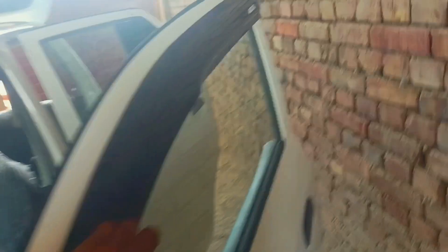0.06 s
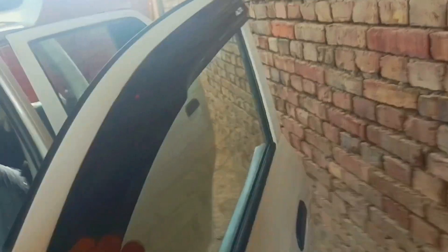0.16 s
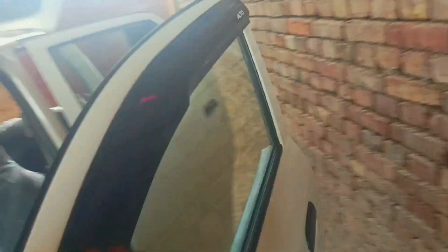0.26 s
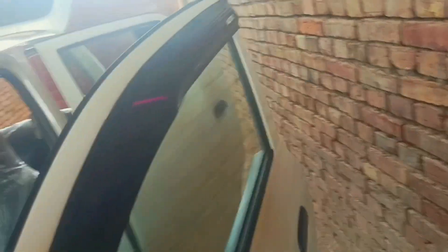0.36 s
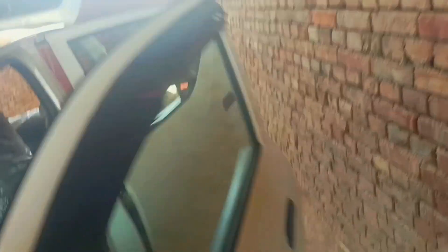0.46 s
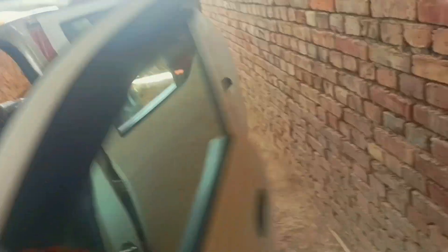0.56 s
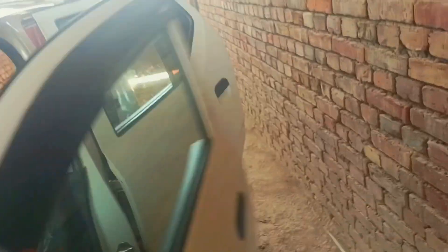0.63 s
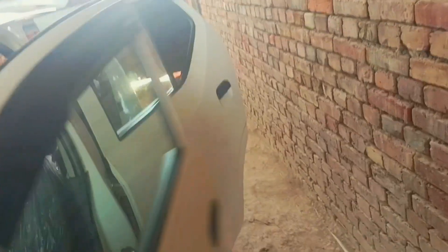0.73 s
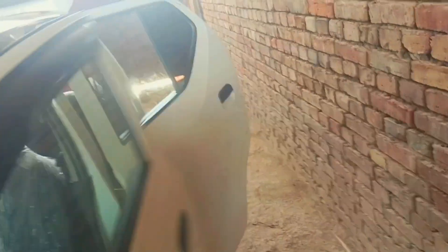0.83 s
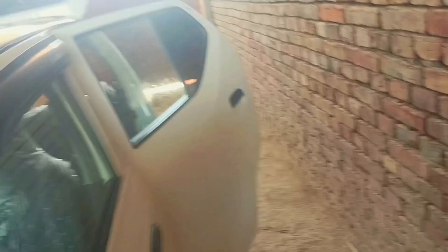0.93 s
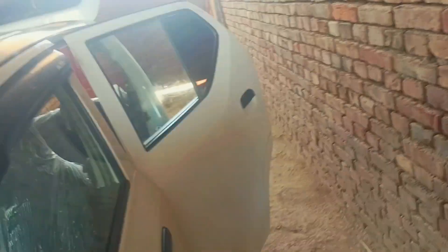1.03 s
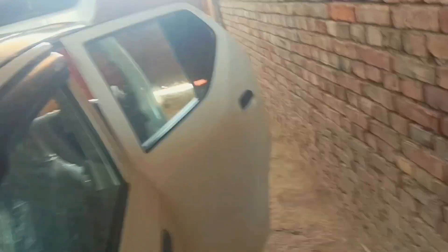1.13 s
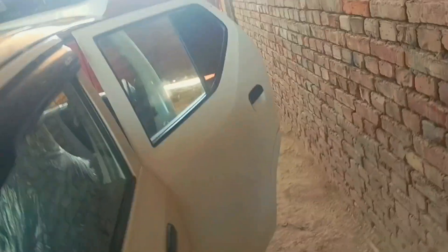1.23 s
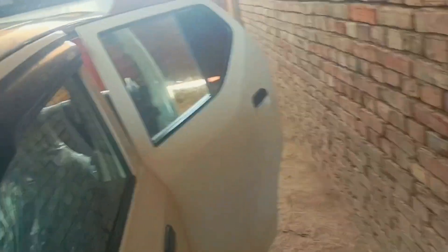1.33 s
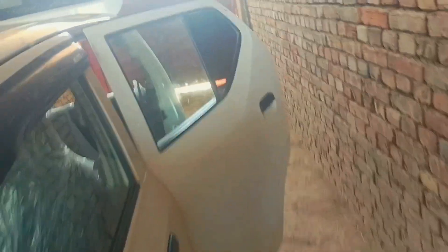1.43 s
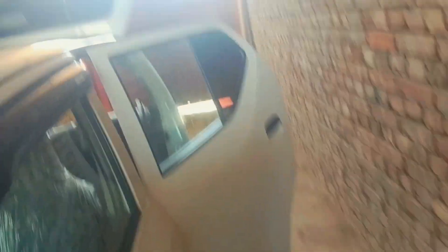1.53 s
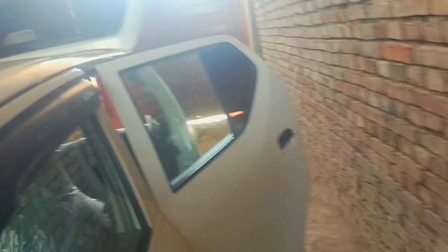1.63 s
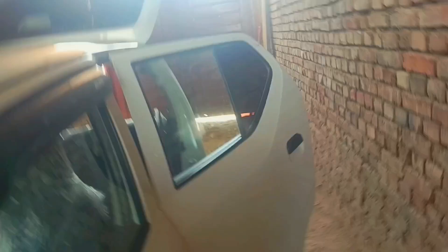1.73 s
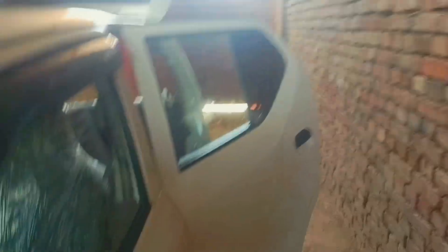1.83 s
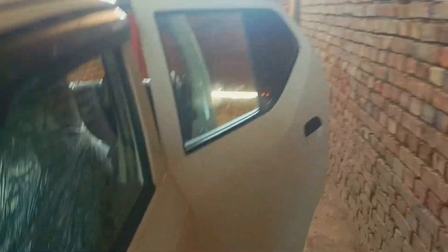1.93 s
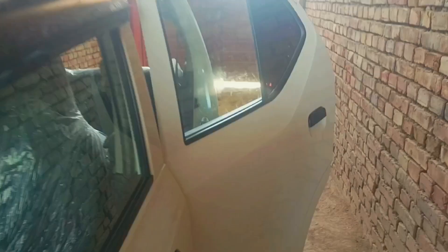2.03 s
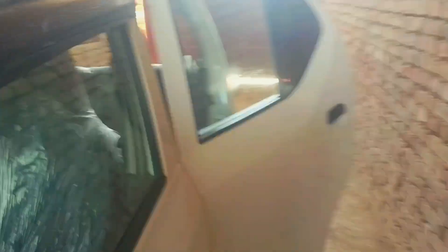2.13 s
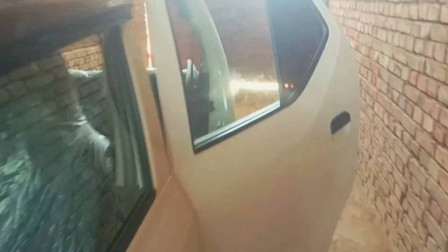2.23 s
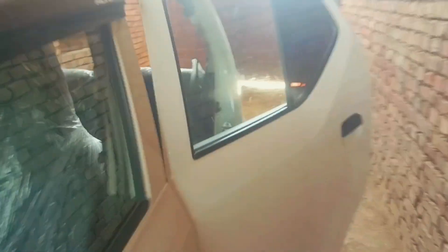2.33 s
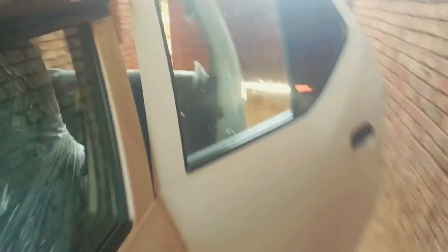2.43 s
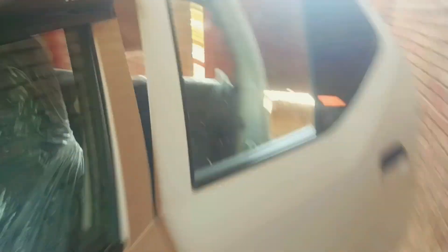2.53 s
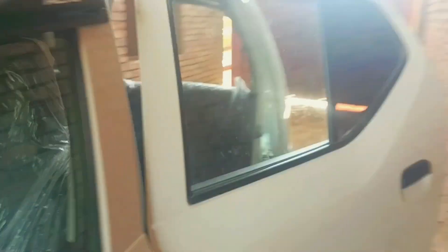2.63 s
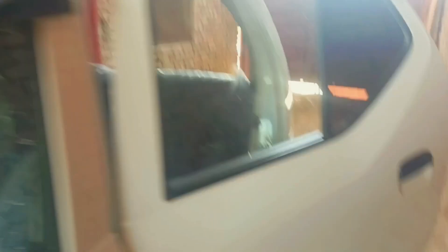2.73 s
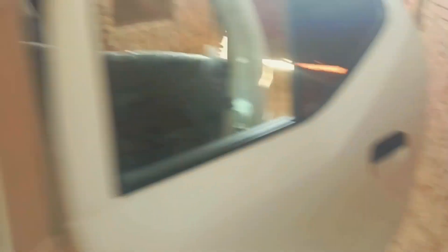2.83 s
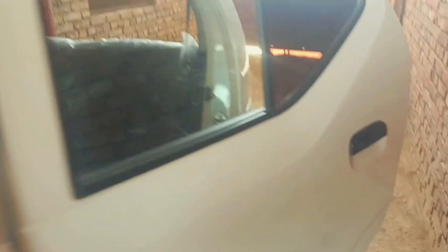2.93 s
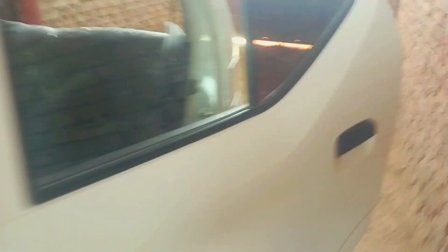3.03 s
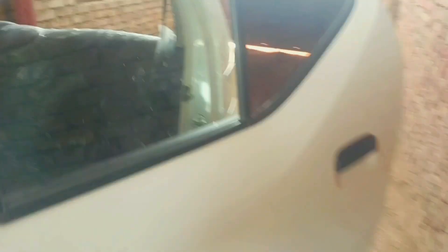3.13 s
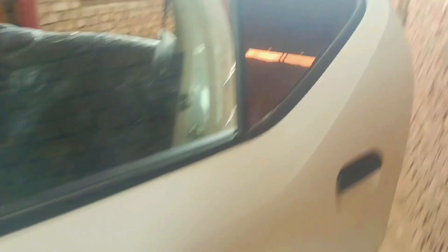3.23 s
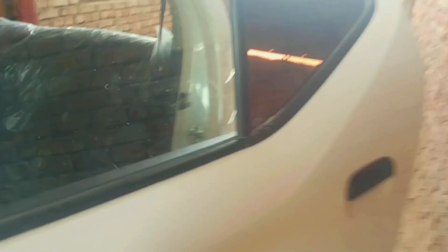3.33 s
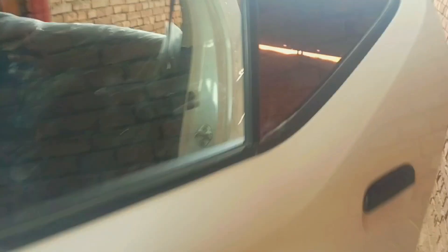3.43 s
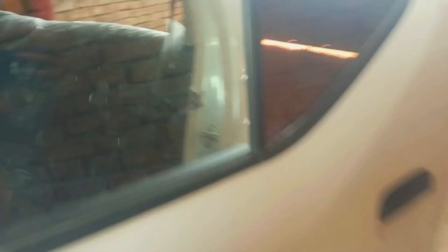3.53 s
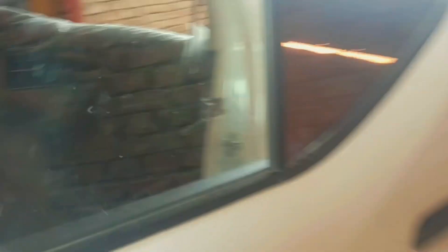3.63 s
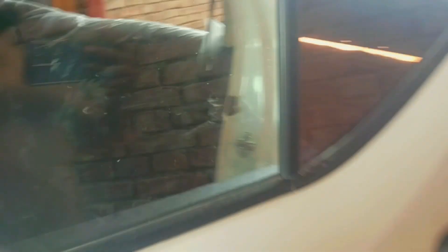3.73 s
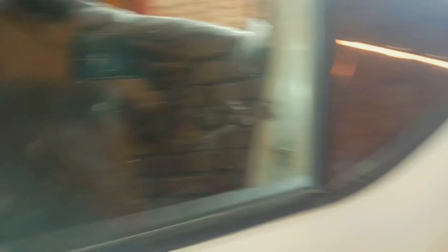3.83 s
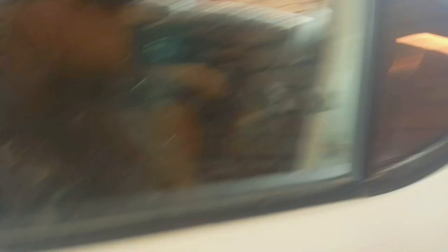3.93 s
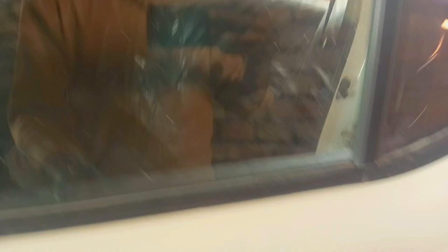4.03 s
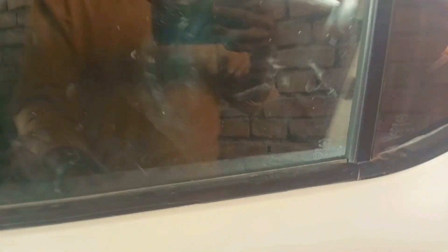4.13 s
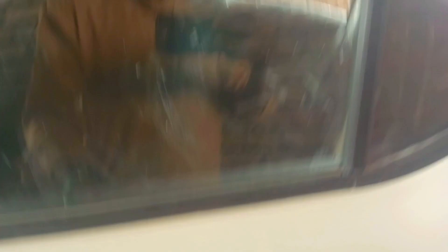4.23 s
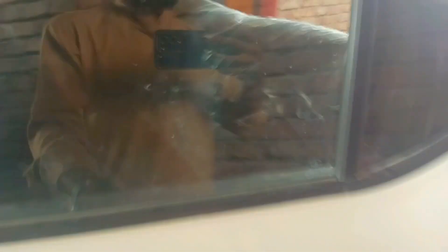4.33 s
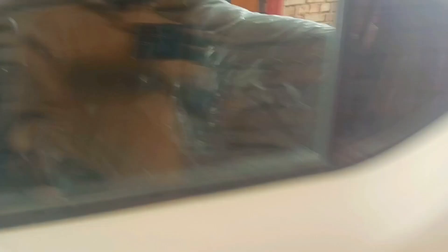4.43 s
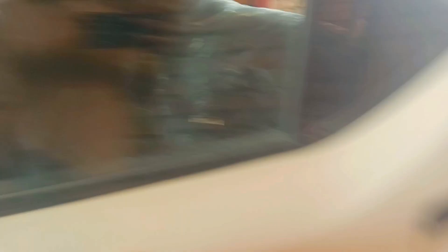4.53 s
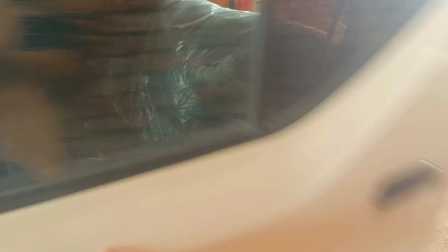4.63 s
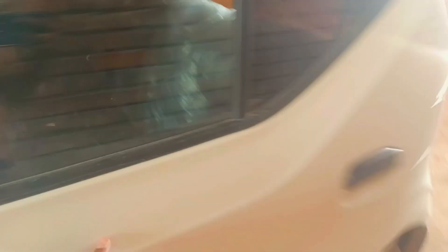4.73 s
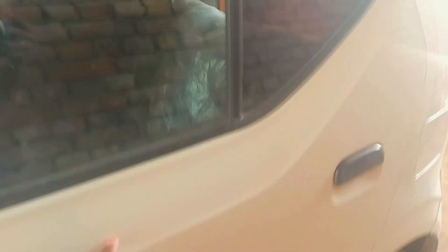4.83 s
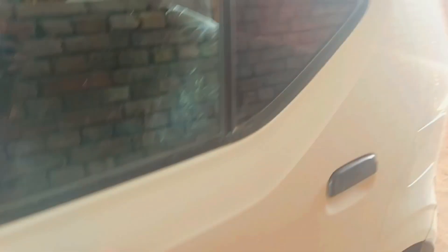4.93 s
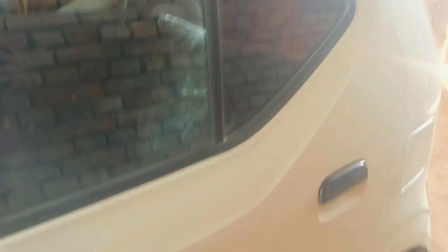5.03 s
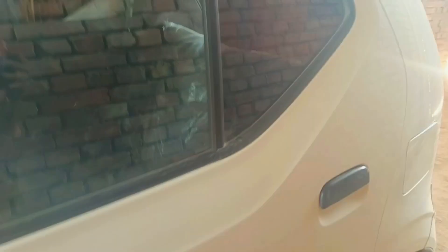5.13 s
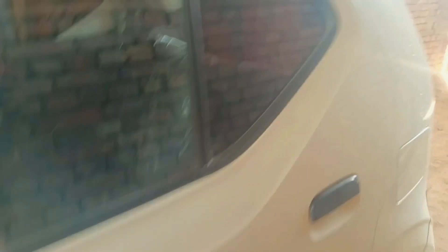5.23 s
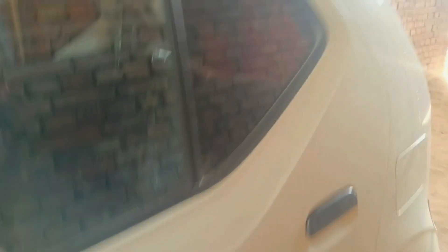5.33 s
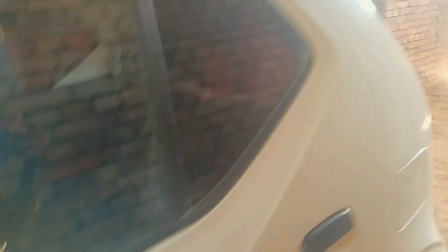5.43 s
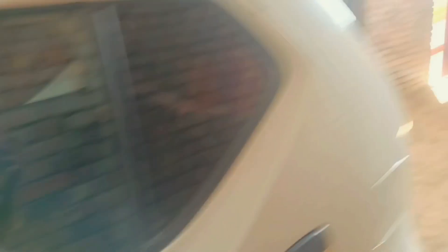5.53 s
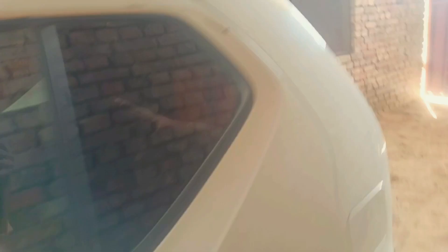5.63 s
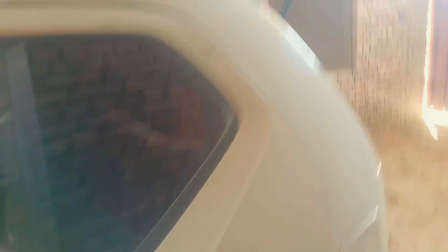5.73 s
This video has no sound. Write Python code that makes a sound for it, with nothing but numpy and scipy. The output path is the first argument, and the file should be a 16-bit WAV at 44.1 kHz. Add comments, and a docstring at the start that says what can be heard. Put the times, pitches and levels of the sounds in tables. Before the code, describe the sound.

A car door slams and rattles, a handle clicks, then a second door slams, close by, over faint scuffing and rumble.

```python
"""Two doors of a small car slam in a narrow brick lane, an arm's length from a hand-held phone.
Shoes scuff, a sleeve swishes and grit ticks over handling rumble and faint hiss. At 1 s the front door
slams: latch strike, landing on the frame, ringing panels, cabin boom, then loose parts rattling.
Knocks and a faint whine follow; the rear handle clicks at 2.8 s and the open door is bumped at 3.5 s.
At 4.9 s the rear door slams, then fingers rub the phone."""
import sys
import numpy as np
from scipy import signal
from scipy.fft import rfft, irfft, next_fast_len
from scipy.io import wavfile

SR = 44100
rng = np.random.default_rng(int(sys.argv[2]) if len(sys.argv) > 2 else 0)


def wrap_up_sound(samples):
    """Save the sound to the file named by the first command line argument, as 16-bit audio."""
    columns = np.atleast_2d(samples).T
    # keep every value between -1 and 1, then stretch to whole-number steps
    tamed = np.clip(columns, -1, 1)
    steps = np.round(tamed * 32767).astype(np.int16)
    wavfile.write(sys.argv[1], SR, steps)


N = 254181
TIME_S = np.arange(N) / SR
AGE_S = TIME_S[:SR]  # 1 s from an onset

# rear door panel modes [f/Hz, level/dB, t60/s]
REAR_MODES = [(114, -14, 0.217), (157, -8, 0.49), (213, -3, 0.23), (262.6, -3, 0.2), (295.6, -3, 0.15),
              (332, -1.5, 0.06), (413, -10.5, 0.26), (447.5, 5.5, 0.31), (527.7, -4, 0.26),
              (598, -6.5, 0.19), (870, -12.5, 0.23), (1087, -6, 0.16), (1250, -7, 0.17), (1255, -8.5, 0.19),
              (1390, -13.5, 0.25), (1850, -16, 0.26), (2225, -18, 0.21), (2280, -19.5, 0.16),
              (2390, -18, 0.17), (2620, -13, 0.12), (3320, -26, 0.18)]


def amp(db):
    """Decibels to gain."""
    return 10 ** (np.asarray(db) / 20)


def add(track, t_s, sound):
    """Mix a sound into a track from t_s on."""
    start = max(int(t_s * SR), 0)
    part = sound[:max(N - start, 0)]
    track[start:start + len(part)] += part


def along(points, hz):
    """Interpolate [f/Hz, value] points over log frequency."""
    f_hz, value = np.transpose(points)
    return np.interp(np.log(np.maximum(hz, 1)), np.log(f_hz), value)


def tilted(colour, db_per_oct):
    """Spectrum tilted about 2 kHz."""
    return [(hz, db + db_per_oct * np.log2(hz / 2000)) for hz, db in colour]


def noise(colour, size, patchy_db=5.5, width_hz=85):
    """Coloured noise, rms 1, with random resonances about width_hz wide."""
    hz = np.arange(size // 2 + 1) * SR / size
    ripple = np.interp(hz / width_hz, np.arange(1024), rng.standard_normal(1024))
    db = along(colour, hz) + patchy_db * ripple * np.minimum(hz / 700, 1)  # long waves pass evenly
    x = irfft(amp(db) * np.exp(2j * np.pi * rng.random(len(hz))), size)
    return x / x.std()


def grain(size, rate_hz, depth_db):
    """Uneven contact: random gain, rms 1, moving at rate_hz."""
    steps = np.arange(size) * rate_hz / SR
    gain = amp(depth_db * np.interp(steps, np.arange(size // 8), rng.standard_normal(size // 8)))
    return gain / np.sqrt(np.mean(gain ** 2))


def stream(colour, size, rate_hz, depth_db, patchy_db):
    """Sustained grainy noise; three crossfading voices shift its resonances."""
    weights = np.array([grain(size, 7, 9) for _ in range(3)])
    fft_size = next_fast_len(size, real=True)
    voices = np.array([noise(colour, fft_size, patchy_db)[:size] for _ in range(3)])
    blend = np.sum(weights * voices, axis=0) / np.sqrt(np.sum(weights ** 2, axis=0))
    return blend * grain(size, rate_hz, depth_db)


def fade(t60_s, rise_s):
    """Impact envelope: quick rise, exponential fall."""
    return (1 - np.exp(-AGE_S / rise_s)) * np.exp(-np.log(1000) * AGE_S / t60_s)


def ring(modes, rise_s, detune):
    """Damped modes; each blow lands elsewhere and shifts them slightly."""
    out = np.zeros(SR)
    for k, (hz, db, t60_s) in enumerate(modes):
        shifted_hz = hz * (1 + detune * rng.standard_normal())
        out += (-1) ** k * amp(db) * fade(t60_s, rise_s) * np.sin(2 * np.pi * shifted_hz * AGE_S)
    return out


def contact(hz, t60_s):
    """Brief contact: one broad damped resonance, faint tail from the lane."""
    hump = [(hz / 8, -36), (hz / 1.9, -12), (hz, 0), (hz * 1.7, -15), (hz * 4, -34), (hz * 30, -70)]
    return noise(hump, SR) * (fade(t60_s, t60_s / 90) + amp(-25) * fade(0.17, 0.019))


def background():
    """Lumpy rumble of the hand on the phone, swelling hiss, steady outdoor air."""
    # spectra [f/Hz, level/dB]
    rumble_colour = [(20, -38.5), (40, -20), (65, -7), (108, 4.5), (155, -3.5), (210, -17.5), (300, -41.5),
                     (600, -55)]
    hiss_colour = [(200, -13), (700, -27), (1100, -20.5), (1600, -3), (2200, 2.5), (4000, -3.5), (6300, -3),
                   (7800, -11), (9500, -6.5), (11500, -23), (15000, -18.5)]
    air_colour = [(100, -2), (300, -7.5), (700, -13), (1500, -14.5), (4000, -23), (9000, -21),
                  (15000, -32.5)]
    # envelopes [t/s, level/dB]
    rumble_level = [(0, -49), (.86, -56), (.9, -77), (1.5, -50), (2.03, -47), (2.35, -69), (2.47, -50),
                    (2.55, -73.5), (2.58, -45.5), (2.82, -44), (3.08, -52), (3.52, -46.5), (3.7, -49.5),
                    (4.1, -48.5), (4.28, -56.5), (4.31, -80), (4.56, -53.5), (4.86, -55), (5.22, -41.5),
                    (5.5, -55), (5.76, -58)]
    hiss_level = [(0, -55), (.34, -58.5), (.46, -76.5), (.68, -68.5), (1.02, -67), (1.45, -53), (2.15, -53),
                  (2.55, -61), (2.82, -57.5), (3.12, -63), (3.5, -59.5), (3.66, -76.5), (4.7, -81.5),
                  (5.25, -70), (5.76, -59.5)]
    rumble = stream(rumble_colour, N, rate_hz=9.5, depth_db=1.5, patchy_db=1)
    rumble *= amp(np.interp(TIME_S, *np.transpose(rumble_level)))
    hiss = stream(hiss_colour, N, rate_hz=120, depth_db=1.4, patchy_db=3.5)
    hiss *= amp(np.interp(TIME_S, *np.transpose(hiss_level)))
    return rumble + hiss + amp(-78.5) * noise(air_colour, N, patchy_db=0)


def scuffs():
    """Grit crunches under a sliding sole, then dies away in the lane."""
    # shoe slides [t/s, length/s, level/dB, tilt/(dB/oct)]
    slides = [(0, 0.038, -41, -1.5), (0.037, 0.04, -35, -2), (1.611, 0.03, -41, 1.5),
              (2.634, 0.0088, -39.5, -1.5), (2.719, 0.17, -51, 2), (3.226, 0.06, -31.5, -0.1),
              (3.485, 0.011, -45, -3), (3.688, 0.017, -66, 10), (3.791, 0.021, -52.5, -1.5),
              (3.814, 0.015, -41, -3), (4.475, 0.021, -59, 6)]
    # grit spectrum [f/Hz, level/dB]
    grit_colour = [(200, -11.5), (500, -9), (850, -13.5), (1500, 1.5), (2700, 3), (4200, -3.5),
                   (6500, -9.5), (9500, -16.5), (11500, -29.5), (15000, -24)]
    out = np.zeros(N)
    for t_s, length_s, db, db_per_oct in slides:
        envelope = (1 - np.exp(-AGE_S / 0.0038)) * np.exp(-np.maximum(AGE_S - length_s, 0) / 0.026)
        grit = noise(tilted(grit_colour, db_per_oct), SR, patchy_db=3)
        add(out, t_s, amp(db) * envelope * grit * grain(SR, rate_hz=695, depth_db=1.5))
    return out


def sleeve():
    """Cloth rustles with arm speed, one bell curve per move."""
    # arm moves [peak t/s, length/s, level/dB, tilt/(dB/oct)]
    moves = [(0.057, 0.046, -38, -1), (0.247, 0.071, -48.5, 3.5), (0.378, 0.093, -61.5, 2),
             (2.929, 0.16, -53.5, 5), (3.837, 0.029, -48.5, 6), (4.088, 0.067, -65.5, 4.5),
             (4.25, 0.068, -64.5, 3.5), (4.483, 0.067, -68.5, 4.5), (4.596, 0.055, -75, 9.5),
             (4.848, 0.15, -67.5, 5), (5.17, 0.19, -47, -3), (5.362, 0.13, -44, -5.5),
             (5.52, 0.14, -49, -1.5)]
    # cloth spectrum [f/Hz, level/dB]
    cloth_colour = [(600, -52), (950, -20.5), (1300, -1), (1700, 8.5), (2300, 1.5), (3200, -1.5),
                    (5000, -17), (9000, -18), (15000, -50)]
    out = np.zeros(N)
    for peak_s, length_s, db, db_per_oct in moves:
        start_s = max(peak_s - 0.5, 0)
        speed = np.exp(-2 * ((start_s + AGE_S - peak_s) / length_s) ** 2)
        rustle = stream(tilted(cloth_colour, db_per_oct), SR, rate_hz=330, depth_db=1.5, patchy_db=5)
        add(out, start_s, amp(db) * speed * rustle)
    return out


def ticks():
    """Tiny hard contacts with no body behind them."""
    # lock and grit ticks [t/s, level/dB, f/Hz, t60/s]
    hits = [(.329, -47, 8500, 0.062), (0.535, -62, 10100, 0.13), (0.648, -60.5, 10200, 0.21),
            (.98, -39, 14500, 0.018), (0.996, -51.5, 2040, 0.044), (1.871, -41, 4500, .035),
            (1.9015, -29.5, 4100, 0.017), (2.642, -32.5, 3560, 0.029), (2.651, -32, 3030, 0.021),
            (3.103, -49, 3250, 0.045), (3.497, -34.5, 2100, 0.031), (3.55, -52.5, 7000, 0.059),
            (3.784, -51.5, 5260, 0.066), (3.95, -64, 7100, .027), (4.206, -54.5, 5030, 0.017),
            (4.269, -61, 7100, .044), (5.513, -47, 3200, .07), (5.559, -57.5, 7500, 0.13)]
    out = np.zeros(N)
    for t_s, db, hz, t60_s in hits:
        add(out, t_s, amp(db) * contact(hz, t60_s))
    return out


def knocks():
    """Tap, hollow body, dull thud: the lower the part, the later and longer."""
    # hand and foot knocks [t/s, tap/dB, tap f/Hz, body/dB, body f/Hz, thud/dB]
    hits = [(0.404, -45, 2730, -58, 338, -63), (1.617, -32.5, 1230, -41.5, 724, -44.5),
            (1.87, -32.5, 1000, -40.5, 610, -38.5), (2.582, -37.5, 2380, -59, 920, -72),
            (3.231, -29.5, 1430, -32.5, 480, -39), (3.286, -37.5, 704, -37, 510, -54.5),
            (3.483, -51, 1800, -44, 450, -33.5)]
    out = np.zeros(N)
    for t_s, tap_db, tap_hz, body_db, body_hz, thud_db in hits:
        add(out, t_s, amp(tap_db) * contact(tap_hz, t60_s=0.06))
        add(out, t_s + 0.00301, amp(body_db) * contact(body_hz, t60_s=0.21))
        add(out, t_s + 0.02, amp(thud_db) * contact(hz=197, t60_s=0.24))
    return out


def clatter(colour, decay):
    """Dense panel modes, each octave with its own decay."""
    spectrum = rfft(noise(colour, SR))  # 1 Hz bins
    octave = np.log2(np.clip(np.arange(len(spectrum)), 64, 16384))
    out = np.zeros(SR)
    for k in range(6, 15):
        band = irfft(spectrum * np.maximum(1 - abs(octave - k), 0), SR)
        out += band * fade(along(decay, 2 ** k), rise_s=0.002)
    return out


def slam(blows, modes, crack_colour, panel_colour, decay, crack_t60_s, buzz_db):
    """Door meets latch and frame in several blows; each cracks, buzzes the trim, rings the panels."""
    out = np.zeros(N)
    for t_s, crack_db, clatter_db, ring_db, low_cut_hz in blows:
        crack = amp(crack_db) * noise(crack_colour, SR) * fade(crack_t60_s, rise_s=0.0006)
        panels = amp(clatter_db) * clatter(panel_colour, decay)
        buzz = grain(SR, rate_hz=350, depth_db=buzz_db)
        ringing = amp(ring_db) * ring(modes, rise_s=0.002, detune=0.0043)
        # the light latch moves no bass; the whole door landing does
        low_cut = signal.butter(2, low_cut_hz, "high", fs=SR, output="sos")
        add(out, t_s, signal.sosfilt(low_cut, crack + panels * buzz + ringing))
    return out


def front_door():
    """First slam: seven blows, longer panel ring."""
    # latch and frame blows [t/s, crack/dB, clatter/dB, ring/dB, low cut/Hz]
    blows = [(1.041, -37, -60.5, -65, 891), (1.052, -16.5, -21.5, -25, 346), (1.0672, -7, -15, -19.5, 230),
             (1.079, -19, -25.5, -29.5, 117.6), (1.099, -27, -24, -24, 50), (1.137, -25.5, -29, -30, 50),
             (1.167, -45, -32.5, -30.5, 50.4)]
    # panel modes [f/Hz, level/dB, t60/s]
    modes = [(117.5, 2.5, 0.81), (185, -2, .45), (227, -4.5, 0.51), (279, -5.5, 0.46), (316.4, -1.5, .35),
             (344.7, -2.5, 0.47), (394.6, -3, 0.31), (512, -14, 0.36), (575, -3.5, 0.2), (648, -10.5, .35),
             (893, -8.5, 0.28), (964, -13, 0.44), (1093, -10.5, .32), (1330, -11.5, 0.57),
             (1645, -12.5, 0.14), (1922, -13.5, .4), (2101, -12.5, 0.56), (2300, -11, 0.24),
             (2650, -16.5, .35), (3160, -19, 0.19)]
    # metal crack and panel clatter spectra [f/Hz, level/dB]
    crack_colour = [(150, -13.5), (350, -5.5), (600, 7.5), (800, -3), (1150, 7.5), (2100, -7.5),
                    (3200, -9.5), (5500, -27.5), (9500, -31.5), (12000, -44.5), (15000, -41.5)]
    panel_colour = [(60, -20.5), (150, 4), (330, 3), (700, -11), (1200, -13), (2300, -12), (4200, -21.5),
                    (5800, -22), (7800, -33), (9500, -31), (11500, -47.5), (15000, -39)]
    # clatter decay [f/Hz, t60/s]
    decay = [(100, 0.99), (350, 0.63), (900, .48), (2500, 0.46), (6000, 0.23), (14000, 0.72)]
    return slam(blows, modes, crack_colour, panel_colour, decay, crack_t60_s=0.1, buzz_db=2.5)


def cabin():
    """Each door rocks on its rubber seal and pumps the cabin air."""
    # air booms [t/s, f/Hz, level/dB, t60/s]
    booms = [(1.086, 95, -7, 0.12), (1.147, 64, -9, 0.1), (1.181, 82.5, -7, 0.083),
             (1.226, 75, -4.5, 0.055), (1.268, 66, -26.5, 0.66), (4.9089, 180, 3, 0.033),
             (4.941, 77.4, 6.5, 0.034), (4.995, 72.7, -15, 0.22)]
    out = np.zeros(N)
    for t_s, hz, db, t60_s in booms:
        add(out, t_s, amp(db) * fade(t60_s, rise_s=0.0056) * np.sin(2 * np.pi * hz * AGE_S))
    return out


def rattles():
    """Loose glass and lock rods strike as the front door shakes."""
    # strikes [t/s, level/dB]
    strikes = [(1.1943, -14), (1.2553, -23), (1.292, -36), (1.3165, -28.5), (1.3513, -37), (1.376, -31),
               (1.418, -36)]
    # rattle spectrum [f/Hz, level/dB]
    colour = [(400, -1), (1000, -3), (2200, -1.5), (3600, -9.5), (5400, -6.5), (7500, -22), (9500, -30),
              (15000, -56)]
    envelope = fade(0.03, 0.0011) + amp(-16) * fade(0.28, 0.0083)
    out = np.zeros(N)
    for t_s, db in strikes:
        add(out, t_s, amp(db) * noise(colour, SR) * envelope)
    return out


def whine():
    """Faint, slightly unsteady tone: fades in, holds, fades out."""
    start_s, length_s, edge_s = 1.64, 0.24, 0.02
    hz = 962 * grain(N, rate_hz=55, depth_db=0.11)
    age_s = TIME_S - start_s
    envelope = np.clip(np.minimum(age_s, length_s - age_s) / edge_s, 0, 1)
    return amp(-62) * envelope * np.sin(2 * np.pi * np.cumsum(hz) / SR)


def handle():
    """The rear handle snaps back; the brick wall echoes each click."""
    # clicks [t/s, level/dB]
    clicks = [(2.7853, -16), (2.7892, -36), (3.236, -36)]
    # snap spectrum [f/Hz, level/dB]
    snap_colour = [(800, -37), (1300, -19), (2100, 6), (3400, -6), (4500, 6.5), (7500, -18), (9600, -9),
                   (12000, -24), (15000, -28)]
    # handle modes [f/Hz, level/dB, t60/s]
    modes = [(1820, -8, 0.023), (2224, -5, 0.019), (3004, -16, 0.066), (4000, -8, 0.015), (4200, -5, 0.029),
             (5230, -14, 0.013), (6090, -17.5, 0.023), (9460, -2.5, 0.0042), (13700, -24.5, 0.015)]
    echo_s, echo_db = 0.0083, -13.5
    envelope = fade(0.012, 0.00032) + amp(-18.5) * fade(0.11, 0.0011)
    out = np.zeros(N)
    for t_s, db in clicks:
        snap = noise(snap_colour, SR, patchy_db=1) * envelope
        ringing = amp(-0.5) * ring(modes, rise_s=0.00023, detune=0.0073)
        click = amp(db) * (snap + ringing)
        add(out, t_s, click)
        add(out, t_s + echo_s, amp(echo_db) * click)
    return out


def bumps():
    """Soft pushes wake the open rear door's middle modes; the hand halves their ring time."""
    # pushes [t/s, level/dB]
    pushes = [(3.482, -33), (3.501, -37)]
    push_colour = [(170, -17.5), (450, -3), (600, -6), (1200, -31)]  # [f/Hz, level/dB]
    damped = [(hz, db + along(push_colour, hz), t60_s / 2) for hz, db, t60_s in REAR_MODES]
    out = np.zeros(N)
    for t_s, db in pushes:
        add(out, t_s, amp(db) * ring(damped, rise_s=0.0024, detune=0.0031))
    return out


def rear_door():
    """Second slam: six blows, shorter ring, less trim buzz."""
    # latch and frame blows [t/s, crack/dB, clatter/dB, ring/dB, low cut/Hz]
    blows = [(4.8935, -36, -54, -41, 202), (4.8968, -4.5, -15, -16, 367), (4.9112, -9, -8.5, -23, 60),
             (4.9455, -20, -19.5, -20, 49.6), (4.996, -20, -26, -23, 50), (5.033, -34, -36, -34.5, 200)]
    # metal crack and panel clatter spectra [f/Hz, level/dB]
    crack_colour = [(150, -6), (350, 10), (600, -19), (950, -7), (1250, 4), (1650, -16), (2450, -3),
                    (3300, -28), (5300, -22), (9000, -36), (11500, -47), (15000, -42)]
    panel_colour = [(60, 5.5), (150, 2), (430, -0.5), (720, -16.5), (1250, -13), (1700, -14), (2200, -10.5),
                    (3300, -20.5), (5500, -25.5), (9000, -36.5), (11300, -46), (15000, -43)]
    # clatter decay [f/Hz, t60/s]
    decay = [(100, 0.53), (350, 0.34), (900, 0.44), (2500, 0.21), (6000, 0.32), (14000, 0.17)]
    return slam(blows, REAR_MODES, crack_colour, panel_colour, decay, crack_t60_s=0.092, buzz_db=1)


def grip():
    """Fingers rub the phone's case: pressure builds, then slowly eases."""
    # rubbing spectrum [f/Hz, level/dB]
    colour = [(100, -7), (200, 3.5), (380, 2), (520, -11), (700, -36.5), (1000, -72)]
    start_s, attack_s, ease_db_per_s = 5.12, 0.22, 6
    age_s = np.maximum(TIME_S - start_s, 0)
    pressure = np.minimum(age_s / attack_s, 1) * amp(-40 - ease_db_per_s * age_s)
    return pressure * stream(colour, N, rate_hz=32, depth_db=-0.8, patchy_db=7)


def scene():
    """Mono sum at the microphone."""
    slams = front_door() + rear_door() + cabin() + rattles()
    small_sounds = handle() + knocks() + ticks() + bumps() + scuffs() + whine()
    return (slams + small_sounds + background() + grip() + sleeve())[None]


def record(dry):
    """Phone: low cut, soft clip, high cut."""
    low_cut_hz, high_cut_hz = 42, 16000
    thin = signal.sosfilt(signal.butter(2, low_cut_hz, "high", fs=SR, output="sos"), dry)
    rounded = thin / (1 + thin ** 6) ** (1 / 6)
    return signal.sosfilt(signal.ellip(10, 0.2, 80, high_cut_hz, fs=SR, output="sos"), rounded)


dry = scene()
out = record(dry)
wrap_up_sound(out)
```